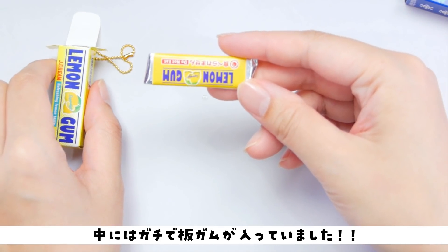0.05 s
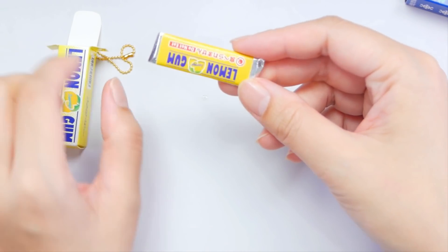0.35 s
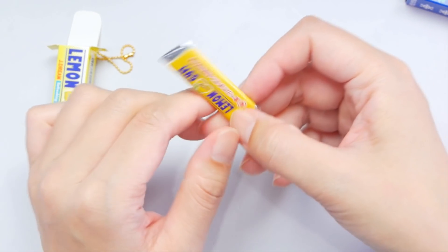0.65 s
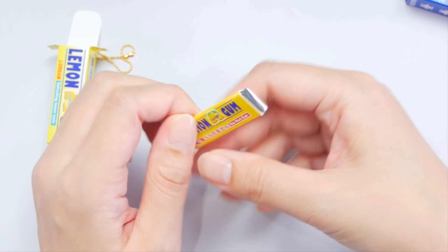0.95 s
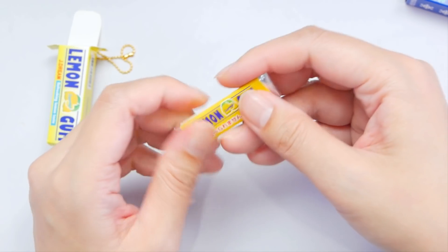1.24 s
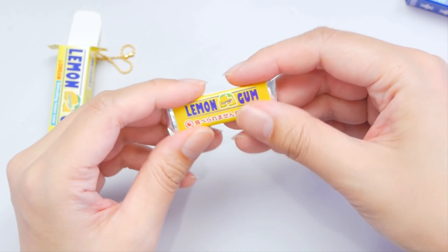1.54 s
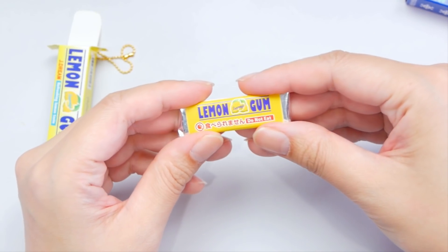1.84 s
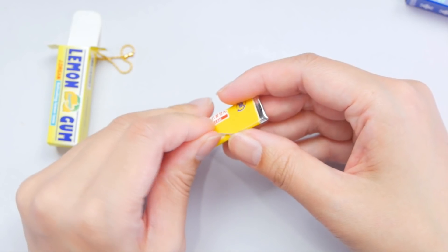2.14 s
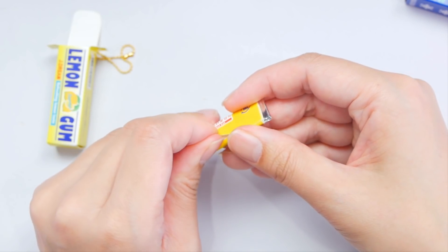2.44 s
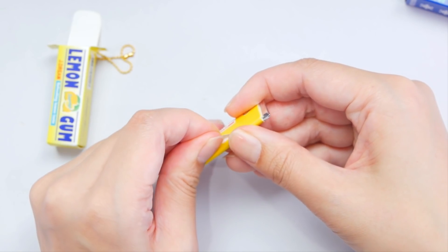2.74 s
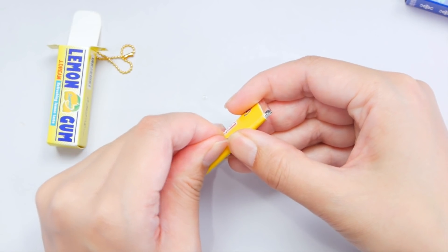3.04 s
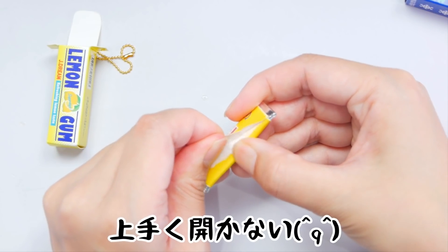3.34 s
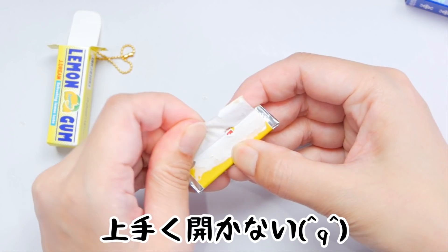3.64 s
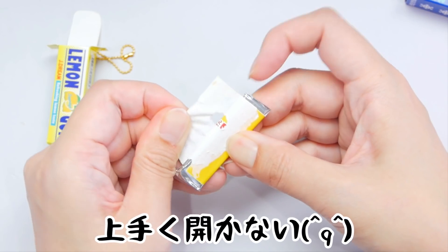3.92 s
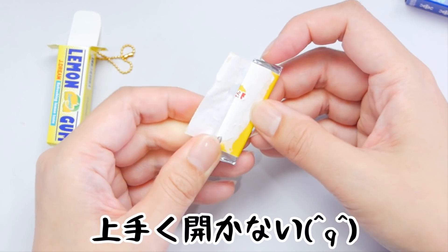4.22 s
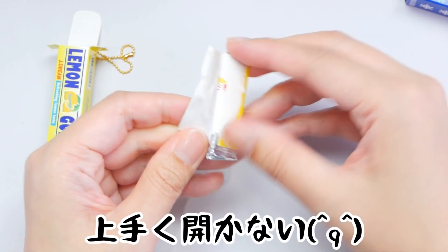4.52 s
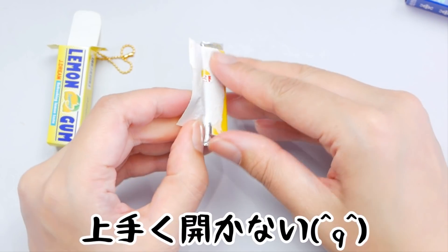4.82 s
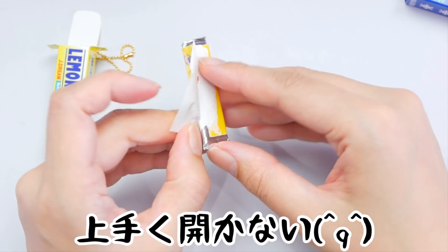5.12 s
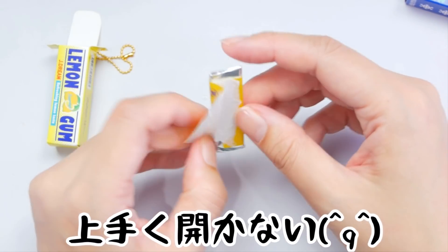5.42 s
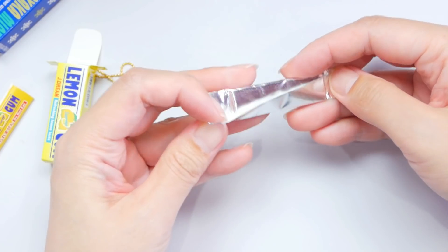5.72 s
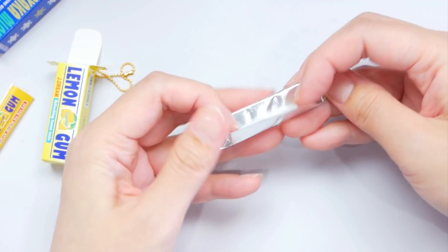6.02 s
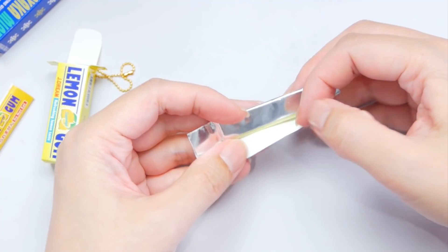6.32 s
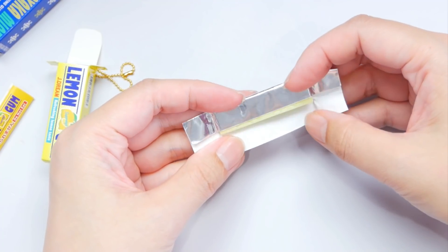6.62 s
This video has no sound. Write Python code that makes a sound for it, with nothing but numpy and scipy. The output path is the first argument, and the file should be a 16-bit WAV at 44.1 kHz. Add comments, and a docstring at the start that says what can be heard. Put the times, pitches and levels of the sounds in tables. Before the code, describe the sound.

Soft handling and nail clicks lead to a sharp paper rip, followed by the rustle and crackle of a foil gum wrapper.

```python
"""The paper sleeve of a stick of gum is torn open close by, in a small, quiet room. Fingers turn the stick and
a nail picks at the seam; then fibres fracture in three pulls and one glued fold rips loudly. The flap is folded
back, the sound drops out for an instant, and the foil inside is unfolded. Stick-slip friction makes the sheets
rustle, buckling facets crack and ring in their modes, and the hands add dull thumps and a low push of air."""
import sys
import numpy as np
from scipy import signal
from scipy.fft import rfft, irfft, next_fast_len
from scipy.io import wavfile
from scipy.ndimage import uniform_filter1d

SR = 44100
rng = np.random.default_rng(int(sys.argv[2]) if len(sys.argv) > 2 else 0)


def generate_wav(signal):
    """Clip the signal to [-1, 1] and save it as 16-bit WAV at the path in sys.argv[1]."""
    frames = np.transpose(np.atleast_2d(signal))
    scaled = np.clip(frames, -1, 1) * 32767
    pcm = np.round(scaled).astype(np.int16)
    wavfile.write(sys.argv[1], SR, pcm)


N = 302526
TIME = np.arange(N) / SR
BRIEF = TIME[:6000]  # time axis of a transient
LEAD_IN = 16  # samples over which a crack builds up
EDGE_HZ = 16000  # upper band limit

# a brief dropout of all sound, as the foil begins: (start [s], end [s])
GAP = (5.5565, 5.565)
# three pulls on the sleeve (up to the rip, on from it, along the seam), each a list of
# (time [s], friction level [dB], flexing level [dB], brightness [dB], left over right [dB])
TEAR_PULLS = [
    [(3.0, -74, -84, -1, 0), (3.105, -50, -65.5, 0, -1), (3.12, -43.5, -67, 7, 6),
     (3.185, -50.5, -65.5, 7, 3), (3.212, -32.5, -53, 7.5, 5), (3.28, -38, -63.5, 10, 7),
     (3.34, -40, -67, 12.5, 5), (3.435, -14, -50.5, 4.5, 11)],
    [(3.435, -13, -59, -5, 1), (3.507, -32, -54, 3, 2), (3.573, -27.5, -56, 2, 5),
     (3.638, -41, -59.5, 4, 5), (3.666, -16, -46, -13, 3.5), (3.71, -30.5, -60, -2.5, 1.5),
     (3.742, -77, -80, -10, -2)],
    [(3.742, -72, -78, -8, -2), (3.768, -61.5, -72, -.5, 1), (3.818, -25.5, -52.5, -2.5, 7),
     (3.878, -20, -45, -4, 2), (3.98, -44.5, -65, -13, 0.5), (4.035, -63, -68.5, -5, -1),
     (4.06, -61, -65, -6, 1.5), (4.11, -59, -64.5, -6, 2)],
]


def tearing():
    """Progressive fracture: paper under tension gives way in many tiny steps, a grainy rasp."""
    # spectrum of tearing paper: (frequency [Hz], relative level [dB])
    paper = [(100, -37.5), (400, -29.5), (1000, -26), (1900, -19.5), (2500, -22), (3200, -23.5),
             (4400, -4.5), (5500, -3), (6500, -2.5), (8200, 2), (11000, -1.5), (13500, 3.5), (15800, -11)]
    out, pulls = np.zeros((2, N)), sum(TEAR_PULLS, [])
    add(out, *friction(pulls, paper, slips_per_s=1100, spread_db=4.8, hiss_db=-8, slip_t60=.003))
    return out


def rip(apart=.8):
    """Sudden release of strain: the glued fold fails in jerks; brief decaying tones colour the tail."""
    # jerks of the fold: (time [s], level [dB], decay time T60 [s])
    jerks = [(3.438, -2, 0.027), (3.4412, -1, .018), (3.4440, -3.5, .014), (3.4481, -11.5, 0.079)]
    # spectrum of its breaking fibres: (frequency [Hz], relative level [dB])
    fold_spectrum = [(100, -30), (300, -33), (600, -21), (1300, -42.5), (2000, -4), (2600, -11),
                     (3500, 2.5), (5200, 4.5), (6200, -4), (7800, 5), (10000, 0.5), (12000, -8.5),
                     (15800, -32)]
    # tones in the tail of the rip: (frequency [Hz], level [dB], decay time T60 [s])
    rip_tail_tones = [(2050, -31, .07), (3200, -27, .06), (3475, -23, .08), (4455, -25, .06),
                      (4734, -24, .07), (5335, -25, .07)]
    out, start = np.zeros((2, N)), jerks[0][0]
    for s, db, t60 in jerks:
        rush = arrival(rng.standard_normal(len(BRIEF)), s) + apart * rng.standard_normal((2, len(BRIEF)))
        add(out, s, unit(colour(rush, fold_spectrum)) * amp(db - 60 * BRIEF / t60))
    for hz, db, t60 in rip_tail_tones:
        tone = amp(db - 60 * BRIEF / t60) * np.sin(2 * np.pi * (hz * BRIEF + rng.random()))
        add(out, start, arrival(tone, start))
    return out


def fibre_ticks(gain_db=-4.5, scatter_db=3.5, lean_db=4, lean_scatter_db=5, slots=80):
    """Brittle fracture: strained fibres and creases snap, a few loudly and small ones at random."""
    # loudest snaps: (time [s], relative level [dB], centre frequency [Hz], left over right [dB])
    loud_snaps = [(.1343, -37.5, 7900, -10), (3.1052, -31.5, 10800, 19), (3.2401, -29, 14700, 10),
                  (3.2446, -19.5, 14800, 7), (3.2832, -11, 13900, .5), (3.3121, -17.5, 13000, 3.5),
                  (3.3596, -23, 12600, 6), (3.37, -18.5, 13200, 10.5), (3.4302, -7.5, 10300, -2.5),
                  (3.5105, -13, 10630, 12), (3.5197, -25, 9600, -7), (3.6075, -15, 10700, 8),
                  (3.6473, -17, 10900, 18), (3.6691, -11, 7000, 27), (3.8176, -14, 8000, 1.5),
                  (3.8807, -17, 10400, -8), (3.9402, -18, 9900, -4), (3.9782, -20.5, 10970, 3.5),
                  (4.0105, -35, 8570, 3), (4.9414, -27.5, 13600, -2), (5.6057, -34, 13300, 5.5),
                  (5.762, -29, 11100, -5), (5.8437, -32, 11500, -2), (5.9525, -15, 11600, -4),
                  (6.2376, -20.5, 8700, 8), (6.7582, -34, 9200, -2)]
    # spells of crackle: (start [s], end [s], rate [1/s], relative level [dB], centre frequency [Hz])
    crackle = [(0.049, 0.189, 60, -55, 7500), (2.415, 3.005, 10, -55, 12000),
               (3.028, 3.204, 55, -39, 10900), (3.198, 3.667, 25, -26.5, 11890),
               (3.799, 3.926, 60, -22.5, 8700), (5.58, 5.925, 25, -39, 11540),
               (5.96, 6.68, 25, -37.5, 7000)]
    out, snaps = np.zeros((2, N)), list(loud_snaps)
    for start, end, per_s, db, hz in crackle:
        times, chances = np.linspace(start, end, slots), rng.random(slots)
        for s, chance, size, side in zip(times, chances, *rng.standard_normal((2, slots))):
            if chance < per_s * (end - start) / slots:
                snaps.append((s, db + scatter_db * size, hz, lean_db + lean_scatter_db * side))
    for s, db, hz, side_db in snaps:
        tick = crack(s, hz, t60=.0056, octaves=.75, shiver_db=-4, shiver_t60=.021)
        add(out, s - LEAD_IN / SR, panned(amp(db + gain_db) * tick, side_db))
    return out


def facet_pops(gain_db=-1, ring_t60=.011, damping_power=.82, cutoff_ratio=.83, shove_db=-16):
    """Snap-through buckling: a facet cracks and rings; the point pressed weights its modes."""
    # facets that flip: (time [s], lowest mode [Hz], relative ring level [dB], relative crack level [dB],
    # crack centre [Hz], left over right of the crack [dB], point pressed [0-1])
    flips = [(1.0163, 820, -62, -53, 7800, 0, 0.3), (1.09, 674, -58, -43, 10000, 1, 0.51),
             (1.1795, 687, -57.5, -41.5, 7400, 0, 0.18), (3.782, 2000, -60, -35, 8000, 3, .2),
             (4.1192, 1390, -30.5, -33, 6700, -5, 0.22), (4.123, 724, -31.5, -34, 6960, 12, 0.13),
             (4.709, 753, -53, -43.5, 7000, 11, 0.19), (4.765, 770, -52, -55, 7040, 4, .2),
             (4.844, 687, -48, -56, 8430, 4, .3), (5.0999, 980, -57.5, -51.5, 10300, 5.5, 0.18),
             (5.204, 479, -54, -58.5, 11080, 3, .3), (5.5542, 578, -43, -38.5, 5000, 2, 0.27),
             (5.7325, 1944, -32, -30, 7340, -1, 0.09), (5.921, 1790, -47, -37, 6000, 3.5, 0.3),
             (5.9438, 5070, -21.5, -10.5, 12400, 2.5, 0.68), (5.9463, 4800, -19.5, -27, 5200, -4, 0.47),
             (6.1668, 1900, -20, -24, 9050, 8, 0.2), (6.1667, 2890, -15, -18, 8350, 7, .5),
             (6.2285, 1644, -11.5, -18.5, 4900, 10, 0.37), (6.2292, 2900, -17.5, -15.5, 4960, 6, .4),
             (6.243, 3060, -30, -47, 4000, 0, .5), (6.3343, 1250, -29, -13.5, 10100, 2.5, 0.19),
             (6.384, 1050, -34, -35, 7700, 13.5, 0.23), (6.4764, 1384, -30, -9.5, 9800, 0, .3),
             (6.656, 1460, -35.5, -43, 3960, 3, 0.2), (6.7107, 1740, -32, -31, 5370, -2, 0.68),
             (6.7125, 1150, -32.5, -22.5, 12300, 11, 0.05)]
    # modes of a facet: (frequency [multiple of the lowest], relative level [dB])
    facet_modes = [(1, 8.5), (1.45, 5), (1.9, 3), (2.7, 6), (4.3, 4)]
    out = np.zeros((2, N))
    for s, hz, ring_db, crack_db, crack_hz, side_db, place in flips:
        modes = np.zeros(len(BRIEF))
        for i, (ratio, db) in enumerate(facet_modes):
            if ratio * hz < EDGE_HZ:
                weight = (-1) ** i * abs(np.sin(np.pi * (i + 1) * place))
                decay = amp(db - 60 * BRIEF * ratio ** damping_power / ring_t60)
                modes += weight * decay * np.sin(2 * np.pi * ratio * hz * BRIEF)
        # a small facet hardly radiates below its lowest mode
        radiation = signal.butter(3, cutoff_ratio * hz, "high", fs=SR, output="sos")
        ring = unit_energy(signal.sosfilt(radiation, modes))
        # the flip also shoves the air once: a dry pulse with no pitch
        phase = 2 * np.pi * hz * BRIEF
        shove = unit_energy(np.gradient(phase ** 2 * np.exp(-2 * phase)))
        add(out, s, amp(ring_db + gain_db) * arrival(ring + amp(shove_db) * shove, s))
        snap = crack(s, crack_hz, t60=.004, octaves=.85, shiver_db=-6, shiver_t60=.025)
        snap = amp(crack_db + gain_db) * signal.sosfilt(radiation, snap)
        add(out, s - LEAD_IN / SR, panned(snap, side_db))
    return out


def foil_rubbing(width_hz=1300, ring_db=7, plain_db=-3):
    """Forced resonance: friction drives a mode of the taut foil, which glides as the sheet bends."""
    # spectrum of rubbed foil: (frequency [Hz], relative level [dB])
    foil = [(100, -33.5), (400, -6), (1100, -2), (1800, 0), (2800, -1), (4000, -7), (5200, -2.5),
            (6300, -5.5), (7300, -1), (9000, -3), (12000, -6), (15000, -7.5), (15800, -10.5)]
    # path of the resonance: (time [s], frequency [Hz], relative level [dB])
    glide = [(5.88, 5200, -19), (5.95, 4840, -4.5), (6.064, 6230, 12), (6.25, 6100, -36), (6.38, 7200, -3),
             (6.5, 5170, -17), (6.6, 4030, -2.5), (6.75, 4270, -42)]
    unwrap = strokes(GAP[1], 6.86, rest_db=-63.5, rest_flex_db=-70.5)
    start, rub = friction(unwrap, foil, slips_per_s=600, spread_db=5, hiss_db=.5, slip_t60=.003)
    s, hz, db = np.transpose(glide)
    t = start + np.arange(rub.shape[1]) / SR
    # a moving band-pass: shift the resonance to 0 Hz, smooth, shift back
    carrier = np.exp(2j * np.pi * np.cumsum(np.interp(t, s, hz)) / SR)
    pole = np.exp(-np.pi * width_hz / SR)
    ring = 2 * (carrier * signal.filtfilt([1 - pole], [1, -pole], rub / carrier)).real
    out = np.zeros((2, N))
    add(out, start, amp(plain_db) * rub + amp(ring_db + np.interp(t, s, db)) * ring)
    return out


def sleeve_rubbing():
    """Sliding friction of skin on paper: fingers turn the stick, trace and pick its seam, fold the flap."""
    # spectra of the rubbed sleeve, seam and loose flap: (frequency [Hz], relative level [dB])
    sleeve = [(100, -4.5), (400, -7), (900, -9.5), (1400, -10.5), (2300, -11.5), (3200, -3), (4400, 4.5),
              (6000, 2.5), (8500, 2), (11000, -9), (13500, -8.5), (15800, -14.5)]
    seam = [(100, -26), (400, -13), (800, -8.5), (1400, -7), (2200, -12.5), (3300, -6.5), (4400, 0.5),
            (5200, 6), (6300, 0), (7600, -2), (9500, -11), (11500, -15.5), (13000, -15), (15800, -20.5)]
    flap = [(100, -10), (400, -6), (750, -2), (1200, -2), (1800, -3.5), (2500, -5), (3200, -6.5),
            (4400, -0.5), (6000, -0.5), (8700, 1.5), (10500, 1), (13000, 2.5), (15800, 0)]
    turn = strokes(0, 2.04, rest_db=-75.5, rest_flex_db=-78)
    slide = strokes(2.04, 2.42, rest_db=-67.5, rest_flex_db=-78)
    pick = strokes(2.42, 3.0, rest_db=-70, rest_flex_db=-74, rest_bright_db=4.5)
    fold = strokes(4.1, 5.557, rest_db=-66.5, rest_flex_db=-79)
    out = np.zeros((2, N))
    add(out, *friction(turn, sleeve, slips_per_s=1700, spread_db=6, hiss_db=2, slip_t60=.0011))
    add(out, *friction(slide, seam, slips_per_s=1800, spread_db=3, hiss_db=-3, slip_t60=.0038))
    add(out, *friction(pick, sleeve, slips_per_s=180, spread_db=7.5, hiss_db=-2.5, slip_t60=.0065))
    add(out, *friction(fold, flap, slips_per_s=950, spread_db=7.5, hiss_db=4, slip_t60=.0037))
    return out


def strokes(start, end, rest_db, rest_flex_db, rest_bright_db=2, rest_side_db=1, flatness=2.43):
    """Incoherent addition: the powers of finger strokes and a resting grip sum to one gesture."""
    # finger strokes, 10 dB down one rise before and one fall after the peak: (peak time [s], rise [s],
    # fall [s], friction level [dB], flexing level [dB], brightness [dB], left over right [dB])
    slides = [(.135, 0.017, 0.014, -51, -62, -6, 3), (.14, 0.064, 0.073, -64.5, -65.5, -2, -3),
              (0.289, .045, .055, -54, -76, 7.5, -0.5), (.475, 0.082, 0.054, -57, -74, 6.5, 5),
              (.625, 0.041, 0.028, -62, -75, 3, 1.5), (0.668, .005, 0.052, -48.5, -68, 1.5, -.5),
              (.89, 0.088, 0.11, -53, -75, 4.5, 2.5), (1.109, 0.032, 0.064, -52.5, -81, 6.5, 4),
              (1.275, 0.037, 0.047, -49, -70, 3.5, 1.5), (1.382, 0.022, 0.011, -55, -68, 0, 3),
              (1.515, 0.064, 0.033, -59.5, -70.5, -1, 2.5), (1.607, 0.034, 0.083, -54.5, -66.5, -1, 1),
              (1.68, .13, 0.15, -61.5, -65, -6, 1), (2.055, 0.0037, 0.1, -53, -69.5, 2, 3.5),
              (2.16, 0.07, 0.054, -53.5, -61.5, 2.5, 2), (2.208, 0.0082, 0.0057, -43, -72, 3.5, 3),
              (2.335, 0.021, 0.021, -43, -60, -3.5, 1.5), (4.119, .006, 0.0075, -42.5, -43, -4, -2),
              (4.139, 0.028, 0.048, -42, -50, 2.5, 1), (4.24, .08, 0.065, -56.5, -62, -3.5, 2.5),
              (4.33, .035, 0.043, -51.5, -58.5, 0, 2), (4.493, 0.015, 0.02, -49, -60, -0.5, 2),
              (4.599, 0.0075, 0.02, -46.5, -67.5, 5, 0), (4.73, 0.21, 0.15, -53.5, -68, 3.5, 2),
              (4.852, 0.02, .11, -46.5, -61, 5.5, 1), (4.975, 0.081, 0.043, -48.5, -64, 2, 2),
              (5.17, 0.031, 0.077, -55.5, -69, 4.5, 0), (5.287, 0.018, .017, -51.5, -74.5, 4, -0.5),
              (5.468, 0.012, 0.018, -50, -62.5, 0.5, 1.5), (5.616, 0.018, 0.015, -41, -62, 11.5, 0),
              (5.76, 0.073, 0.079, -39, -56.5, 8, 0), (5.88, 0.066, .05, -45, -63.5, 8, 2),
              (5.948, 0.013, .025, -25.5, -37.5, -1.5, -5), (5.98, 0.063, 0.045, -32, -47, 8, 0.5),
              (6.063, 0.012, 0.021, -27.5, -48, 13, 8.5), (6.13, .07, 0.36, -40, -53.5, 0, 5),
              (6.235, 0.023, 0.014, -30.5, -39.5, -7, -11), (6.375, 0.069, 0.078, -33, -46.5, 0.5, 5.5),
              (6.473, 0.013, 0.015, -27, -50, 2, 5), (6.57, 0.094, 0.11, -42.5, -52.5, -2, 1.5),
              (6.711, 0.0067, 0.03, -39.5, -42, 2, 0), (6.814, 0.058, 0.019, -49, -50, 1, 1.5)]
    t, rows = np.arange(start, end, .001), np.array(slides)
    rows = rows[(rows[:, 0] > start) & (rows[:, 0] < end)]
    s, rise, fall, db, flex_db, bright_db, side_db = rows.T[:, :, None]
    speed = amp(-10 * np.maximum((s - t) / rise, (t - s) / fall) ** flatness)
    power, rest = (amp(db) * speed) ** 2, amp(rest_db) ** 2
    total = power.sum(0) + rest
    flex = ((amp(flex_db) * speed) ** 2).sum(0) + amp(rest_flex_db) ** 2
    bright = ((power * bright_db).sum(0) + rest * rest_bright_db) / total
    side = ((power * side_db).sum(0) + rest * rest_side_db) / total
    return np.transpose([t, 10 * np.log10(total), 10 * np.log10(flex), bright, side])


def friction(gesture, spectrum, slips_per_s, spread_db, hiss_db, slip_t60, spots=32):
    """Stick-slip: uneven slips at many spots of a sheet, over a sliding hiss. Gives (start, sound)."""
    s, *columns = np.transpose(gesture)
    t = np.arange(s[0], s[-1], 1 / SR)
    level_db, flex_db, bright_db, side_db = (np.interp(t, s, c) for c in columns)
    slips = np.zeros((2, len(t)))
    for _ in range(spots):
        size = amp(spread_db * np.minimum(rng.exponential(1, len(t)), 3))
        train = size * (rng.random(len(t)) < slips_per_s / spots / SR)
        response = shiver(s[0], slip_t60)[:, :500]
        slips += signal.oaconvolve(train[None], response, axes=1)[:, :len(t)]
    hiss = arrival(rng.standard_normal(len(t)), s[0]) + 1.1 * rng.standard_normal((2, len(t)))
    sound = colour(bending(unit(slips) + amp(hiss_db) * unit(hiss)), spectrum)
    flex = unit(filtered(sound, lambda f: 1 / (1 + (f / 3000) ** 12)))
    rasp = unit(filtered(sound, lambda f: 1 / (1 + (3000 / f) ** 12) / (1 + (f / 10000) ** 12)))
    sheen = unit(filtered(sound, lambda f: 1 / (1 + (10000 / f) ** 12)))
    treble = (rasp + amp(bright_db) * sheen) / np.sqrt(1 + amp(bright_db) ** 2)
    return s[0], panned(amp(level_db) * treble, side_db) + amp(flex_db) * flex


def bending(x, depth_db=2.1, bins=6, frames=17):
    """Shifting resonances of a bending sheet: random patches of gain in time and frequency."""
    window = dict(nperseg=512, noverlap=384)
    spectra = signal.stft(x, **window)[2]
    patches = uniform_filter1d(rng.standard_normal(spectra.shape[1:]), bins, 0)
    patches = uniform_filter1d(patches, frames, 1)
    return signal.istft(spectra * amp(depth_db * unit(patches)), **window)[1][:, :x.shape[1]]


def crack(s, hz, t60, octaves, shiver_db, shiver_t60):
    """Impulsive excitation: a sharp break and the shiver it leaves in the sheet, in a band around hz."""
    snap = shiver(s, t60) + amp(shiver_db) * shiver(s, shiver_t60)
    snap = np.pad(snap, ((0, 0), (LEAD_IN, 0)))
    return unit_energy(filtered(snap, lambda f: 1 / (1 + (np.log2(f / hz) / octaves) ** 4)))


def shiver(s, t60, apart=.46):
    """Damped vibration of a sheet: decaying noise, only partly coherent between left and right."""
    noise = rng.standard_normal((3, len(BRIEF)))
    return unit_energy(arrival((noise[0] + apart * noise[1:]) * amp(-60 * BRIEF / t60), s))


def nail_picks(body_hz=(750, 2300), click_hz=7500, click_side_db=3):
    """Impulse response: the nail clicks off the seam and the stick answers with the same dull knock."""
    # slips of the nail: (time [s], knock level [dB], click level [dB])
    nail_slips = [(2.541, -53, -56), (2.55, -48.5, -43.5), (2.6319, -44, -45), (2.657, -43, -48),
                  (2.687, -45.5, -50.5), (2.7897, -50.5, -50.5), (2.8959, -58.5, -45), (2.9997, -56.5, -62),
                  (3.088, -51, -46)]
    out = np.zeros((2, N))
    body = signal.butter(3, body_hz, "band", fs=SR, output="sos")
    knock = unit_energy(signal.sosfilt(body, signal.unit_impulse(len(BRIEF))))
    for s, knock_db, click_db in nail_slips:
        click = crack(s, click_hz, t60=.0023, octaves=1, shiver_db=-6, shiver_t60=.034)
        add(out, s, amp(knock_db) * arrival(knock, s))
        add(out, s - LEAD_IN / SR, amp(click_db) * panned(click, click_side_db))
    return out


def finger_bumps(rise_s=.00095, low_side_db=-10, high_side_db=3):
    """Soft impact: flesh excites one low, damped mode; the deep thumps lean to the right."""
    # bumps on the stick and the table: (time [s], frequency [Hz], level [dB], decay time T60 [s])
    impacts = [(0.521, 330, -49, 0.027), (1.18, 169, -68, .06), (1.29, 30.1, -54, 0.88),
               (2.892, 97, -50, .066), (3.437, 92.3, -27, 0.045), (3.666, 104, -46.5, 0.071),
               (3.931, 444, -46.5, 0.033), (4.118, 450, -37, .03), (4.21, 431, -44, 0.026),
               (4.286, 123, -50, 0.066), (4.295, 339.3, -48, 0.039), (5.944, 298, -46, .06),
               (6.711, 419, -37.5, 0.024)]
    out, t = np.zeros((2, N)), TIME[:SR // 2]
    for s, hz, db, t60 in impacts:
        envelope = amp(db - 60 * t / t60) * (1 - np.exp(-t / rise_s))
        thump = arrival(envelope * np.sin(2 * np.pi * hz * t), s)
        add(out, s, panned(thump, low_side_db if hz < 200 else high_side_db))
    return out


def hand_push(wrapper, push_db=-70, tear_boost_db=5, db_per_db=.2, effort_ref_db=-55):
    """Displacement noise: hands push air and table, more as the wrapper gets louder and as they tear."""
    # spectrum of the push: (frequency [Hz], relative level [dB])
    push_spectrum = [(15, -8.5), (35, 9), (60, -4.5), (95, -4), (150, -7), (250, -13), (600, -39),
                     (2000, -78.5)]
    power = abs(uniform_filter1d((wrapper ** 2).mean(0), size=2000))
    effort_db = 10 * np.log10(power + 1e-9) - effort_ref_db
    pulling = (TIME > TEAR_PULLS[0][0][0]) & (TIME < TEAR_PULLS[2][0][0])  # the first two pulls
    boost_db = tear_boost_db * uniform_filter1d(1. * pulling, size=4000)
    return amp(push_db + db_per_db * effort_db + boost_db) * stereo_noise(push_spectrum, apart=.37)


def reverberation(x, wet_db=-19, t60=.076, first_s=.017):
    """Diffuse reflection: a small, well damped room returns a faint, exponentially decaying tail."""
    tail = rng.standard_normal((2, len(BRIEF))) * amp(-60 * BRIEF / t60) * (BRIEF > first_s)
    return amp(wet_db) * signal.oaconvolve(x, tail / np.linalg.norm(tail[0]), axes=1)[:, :N]


def room_air(level_db=-72):
    """Ambient noise: the stationary floor of a still room."""
    # spectrum of the room: (frequency [Hz], relative level [dB])
    air_spectrum = [(18, -29.5), (30, -0.5), (51, -11.5), (174, -14), (336, 4.5), (512, -12.5), (1350, -17),
                    (1910, -41.5), (4650, -20), (7270, -19.5), (14000, -17.5), (16000, -13)]
    return amp(level_db) * stereo_noise(air_spectrum, apart=.5)


def stereo_noise(spectrum, apart):
    """Partial coherence: coloured noise common to both sides, plus a share of each side's own."""
    noise = rng.standard_normal((3, N))
    return unit(colour(noise[0] + apart * noise[1:], spectrum))


def arrival(x, s, sleeve_lead_s=5.6e-5, foil_lead_s=-2.4e-5, spread_s=1e-5):
    """Path difference: the sleeve is heard first on the left, the foil from near the middle."""
    lead = (sleeve_lead_s if s < GAP[1] else foil_lead_s) + spread_s * rng.standard_normal()
    return filtered(x * np.ones((2, 1)), lambda f: np.exp(np.pi * 1j * f * lead * np.array([[1], [-1]])))


def panned(x, side_db):
    """Level difference: left over right by side_db, at constant power."""
    lean = amp(np.atleast_1d(side_db))
    return x * np.array([lean, np.ones_like(lean)]) * np.sqrt(2 / (1 + lean ** 2))


def colour(x, points):
    """Spectral envelope: shapes x by points of (frequency [Hz], level [dB])."""
    hz, db = np.transpose(points)
    return filtered(x, lambda f: amp(np.interp(np.log(f), np.log(hz), db)))


def filtered(x, gain):
    """Linear filtering: multiplies the spectrum by gain(frequency)."""
    size = x.shape[-1]
    padded = next_fast_len(size + 256)
    return irfft(rfft(x, padded) * gain(np.fft.rfftfreq(padded, 1 / SR) + 1), padded)[..., :size]


def amp(db):
    """Decibels to amplitude ratio."""
    return 10 ** (np.asarray(db) / 20)


def unit(x):
    """Power normalisation to rms 1."""
    return x / np.sqrt(np.mean(x ** 2) + 1e-20)


def unit_energy(x):
    """Energy normalisation of a transient to that of 2 ms at rms 1."""
    return x * np.sqrt(.002 * SR / np.mean(np.sum(x ** 2, -1)))


def add(mix, s, sound):
    """Superposes a stereo sound on the mix at time s."""
    part = mix[:, max(round(s * SR), 0):][:, :sound.shape[1]]
    part += sound[:, :part.shape[1]]


def scene():
    """Superposition of the wrapper's direct sound, its reflections, the hands and the room air."""
    wrapper = tearing() + rip() + fibre_ticks() + facet_pops()
    wrapper += foil_rubbing() + sleeve_rubbing() + nail_picks()
    return wrapper + finger_bumps() + hand_push(wrapper) + reverberation(wrapper) + room_air()


def record(dry):
    """Clipping of the loudest snaps, an instant of silence, then a low-pass band limit."""
    sound = np.clip(dry, -1, 1) * ((TIME < GAP[0]) | (TIME > GAP[1]))
    low_pass = signal.firwin(301, EDGE_HZ, window=("kaiser", 8), fs=SR)
    return signal.oaconvolve(sound, low_pass[None], "same")


dry = scene()
out = record(dry)
generate_wav(out)
```